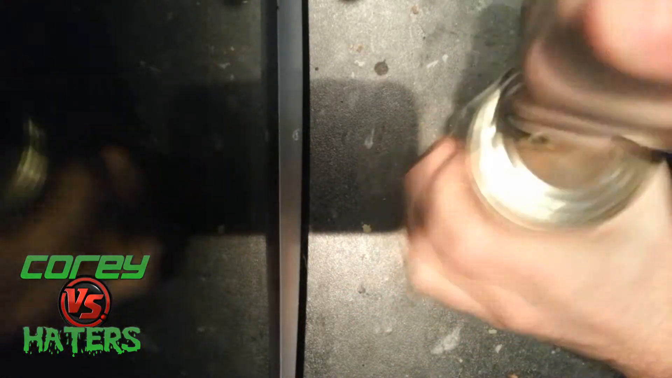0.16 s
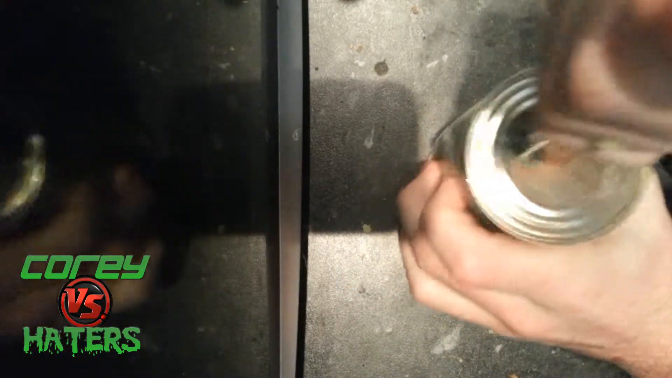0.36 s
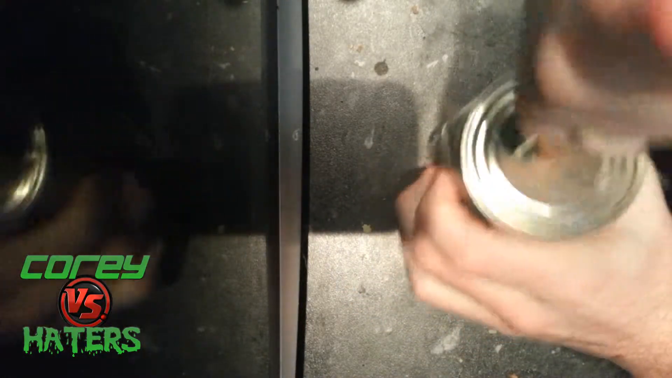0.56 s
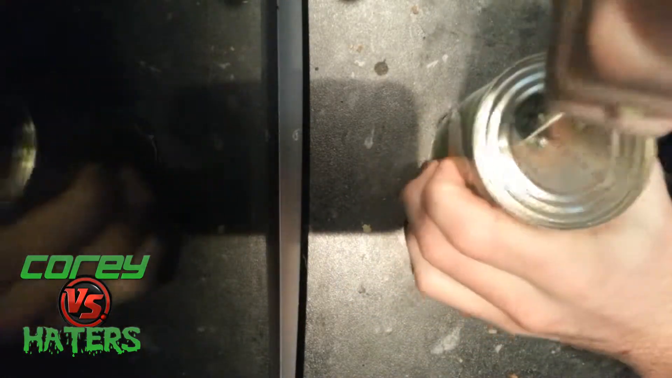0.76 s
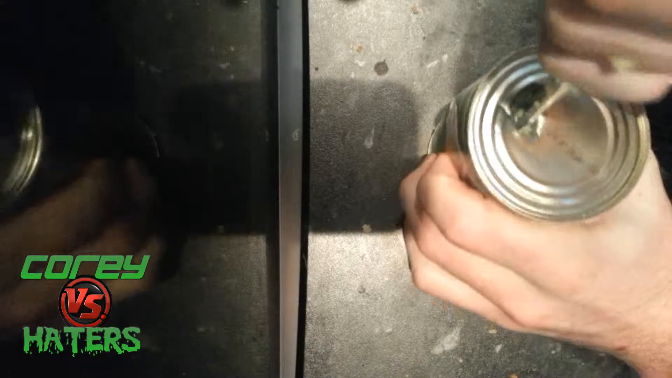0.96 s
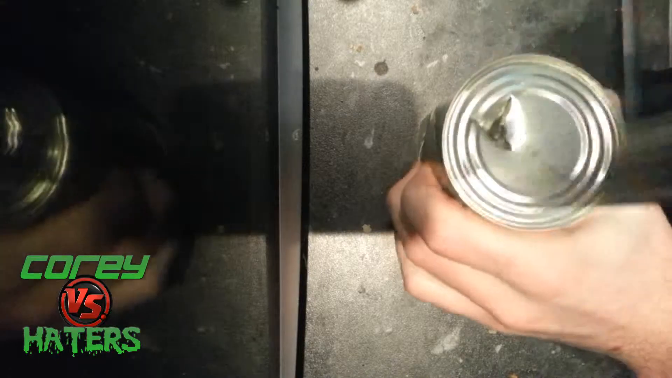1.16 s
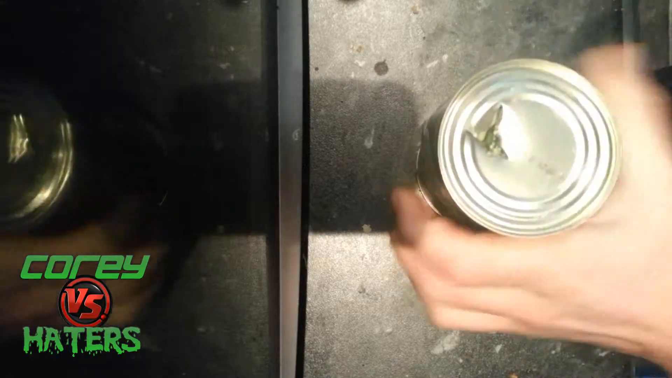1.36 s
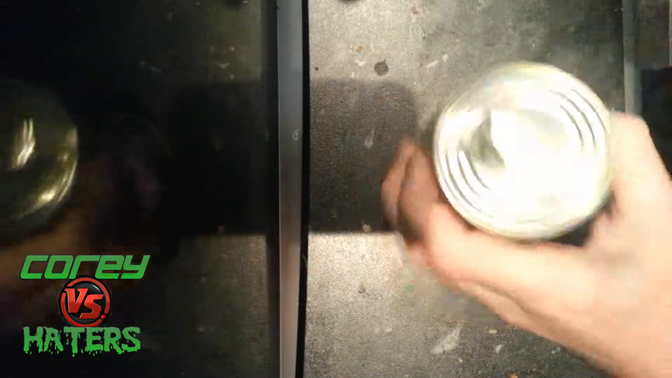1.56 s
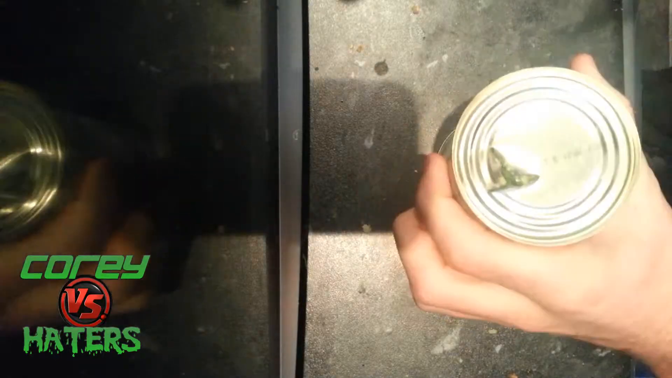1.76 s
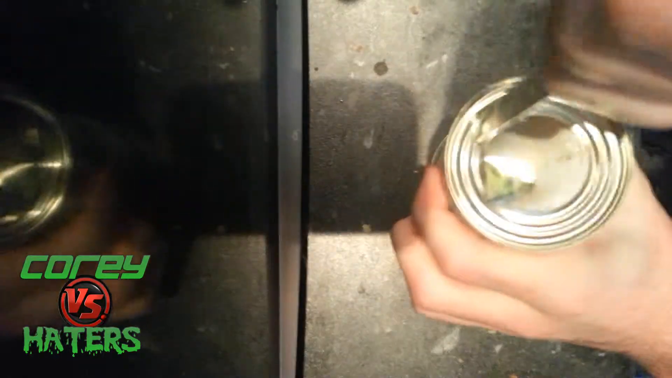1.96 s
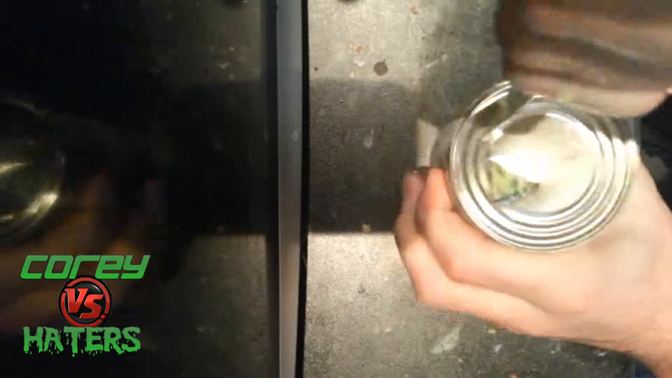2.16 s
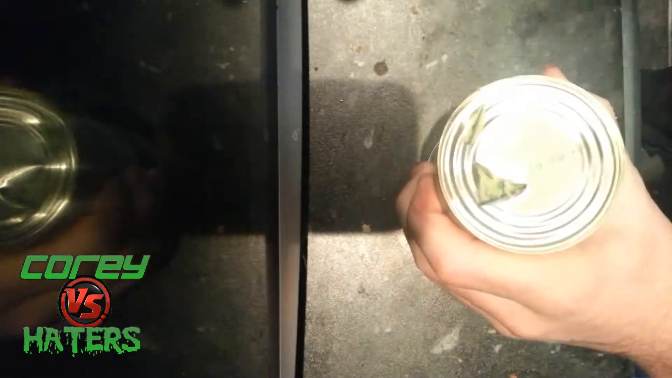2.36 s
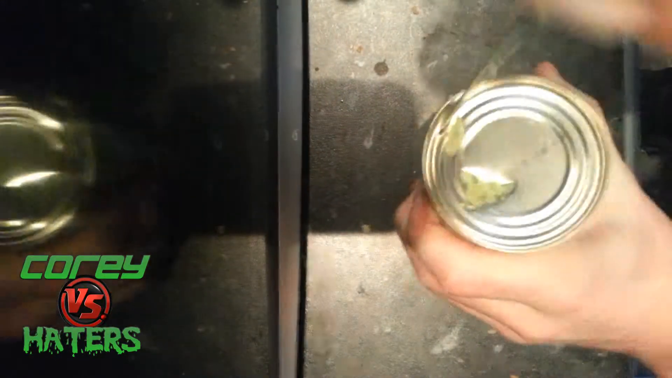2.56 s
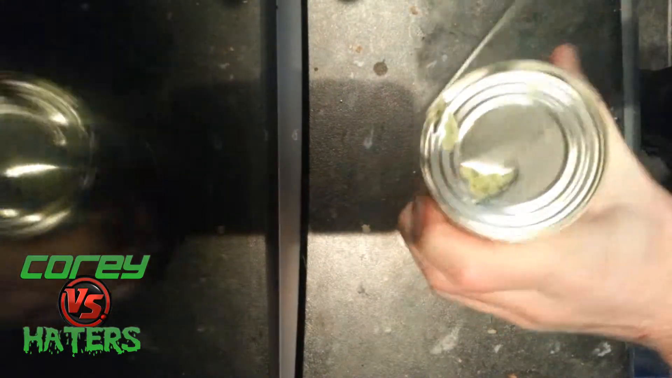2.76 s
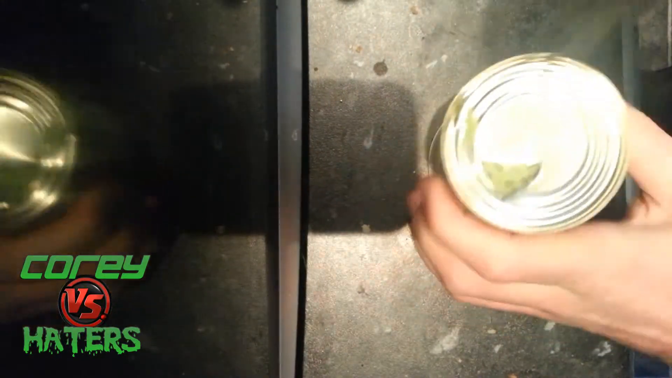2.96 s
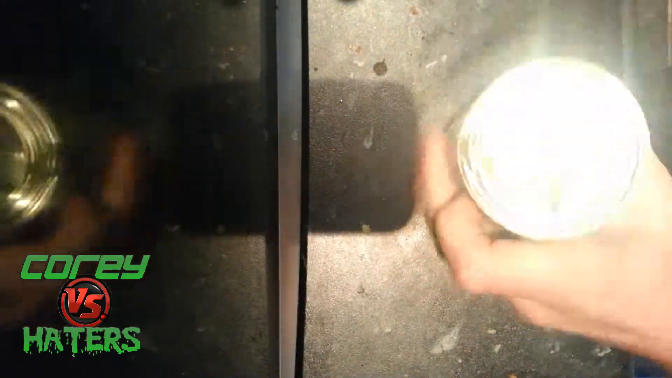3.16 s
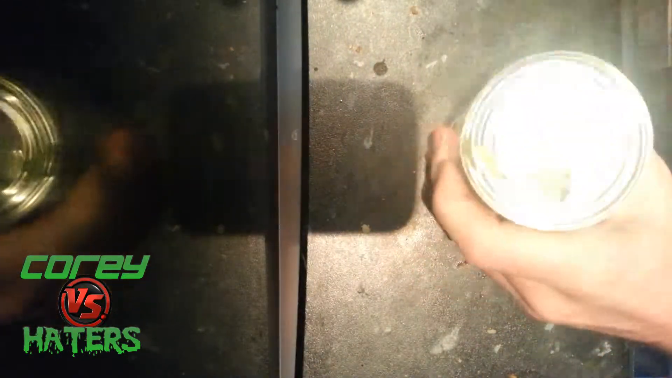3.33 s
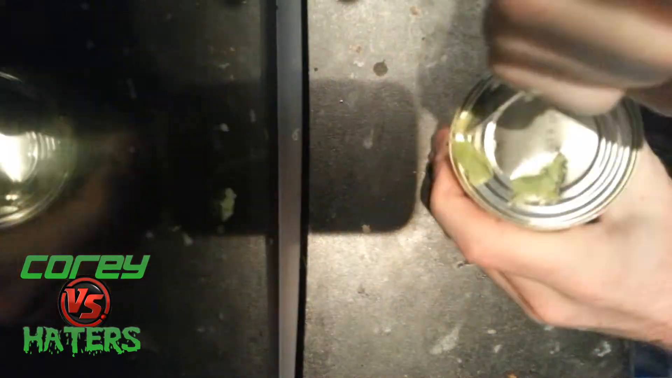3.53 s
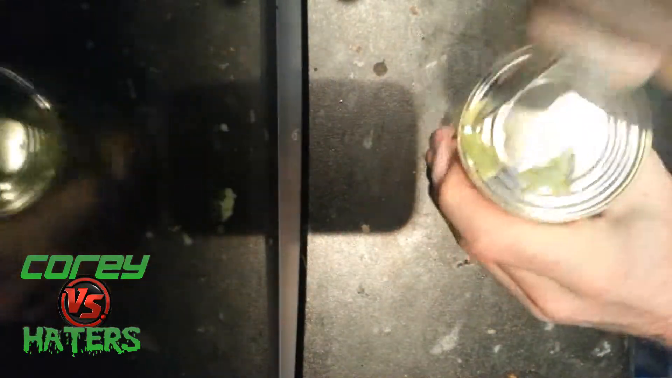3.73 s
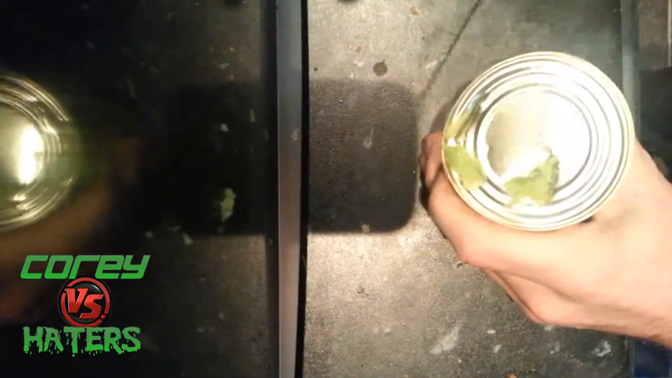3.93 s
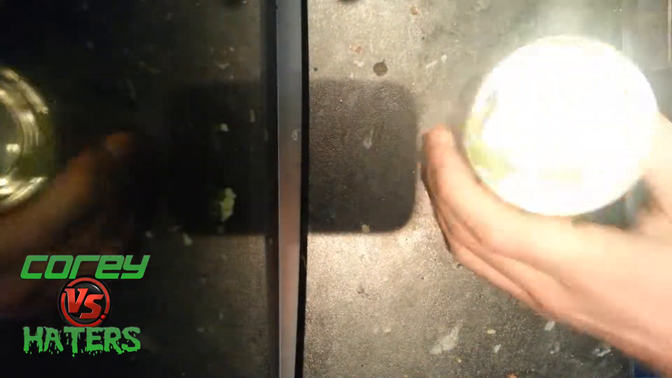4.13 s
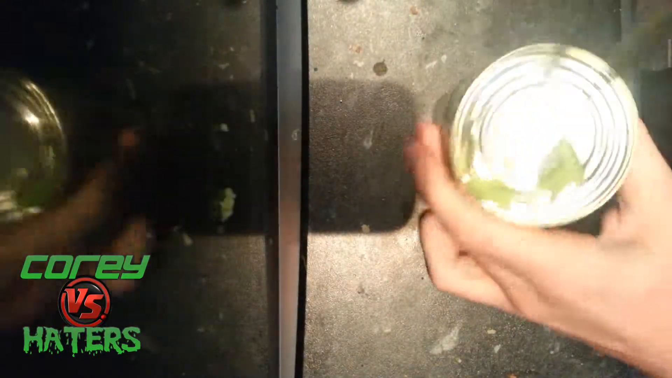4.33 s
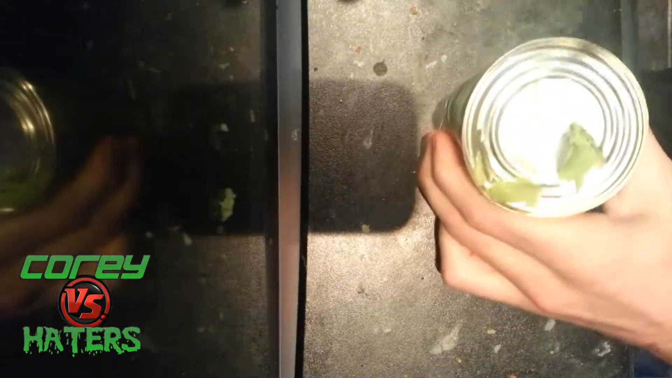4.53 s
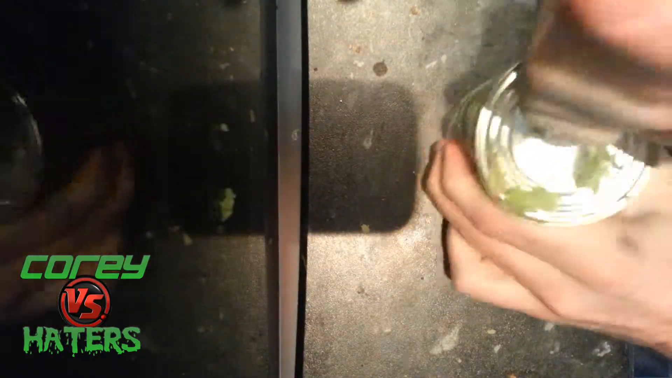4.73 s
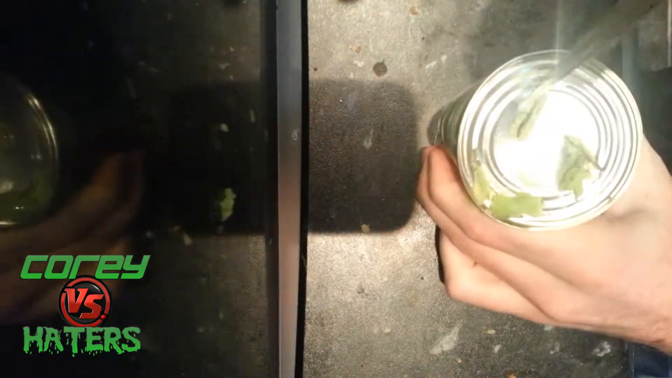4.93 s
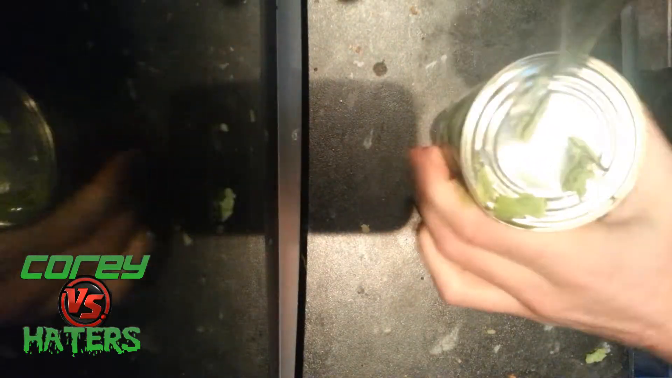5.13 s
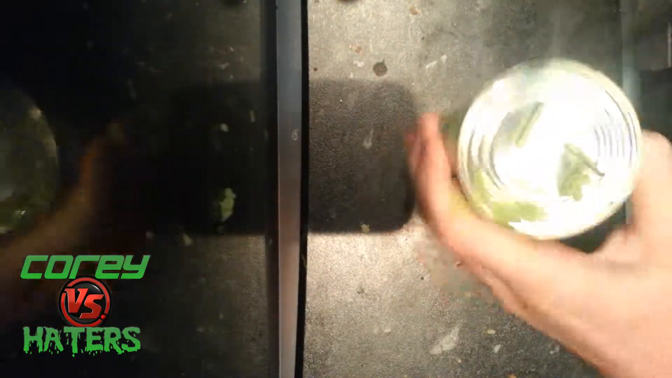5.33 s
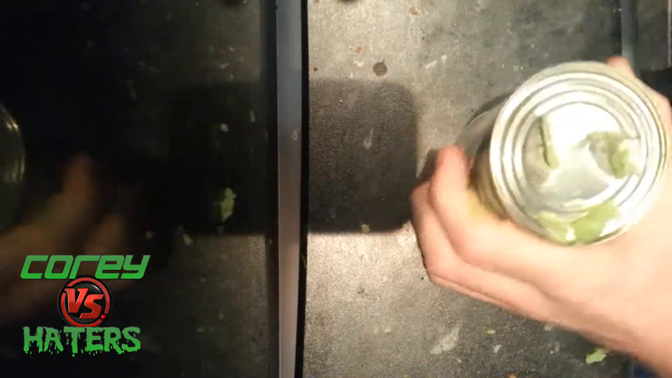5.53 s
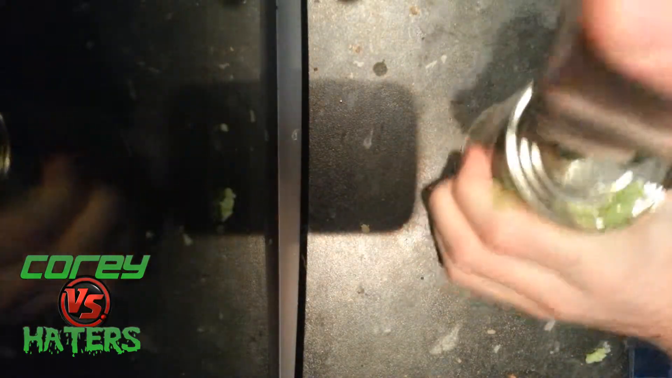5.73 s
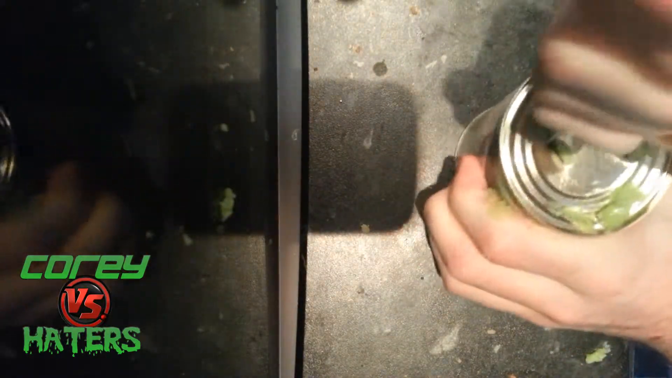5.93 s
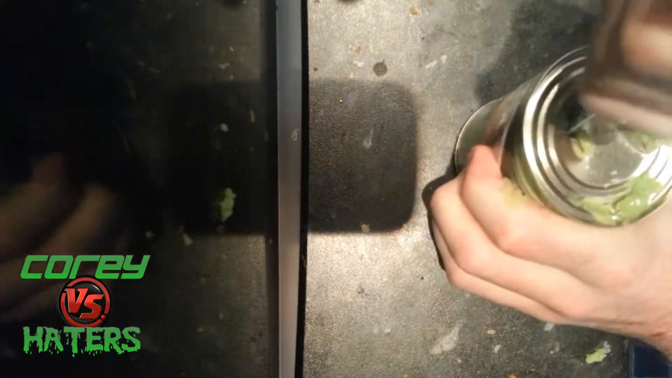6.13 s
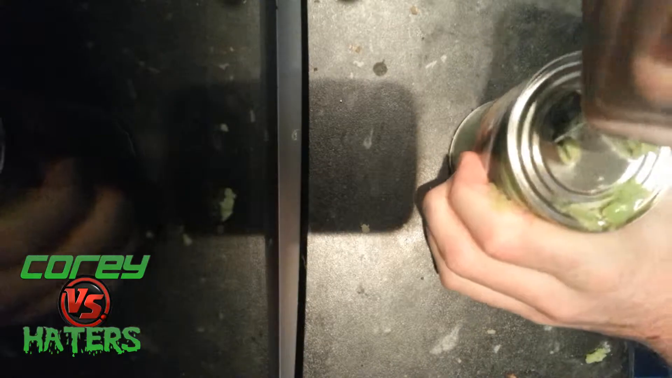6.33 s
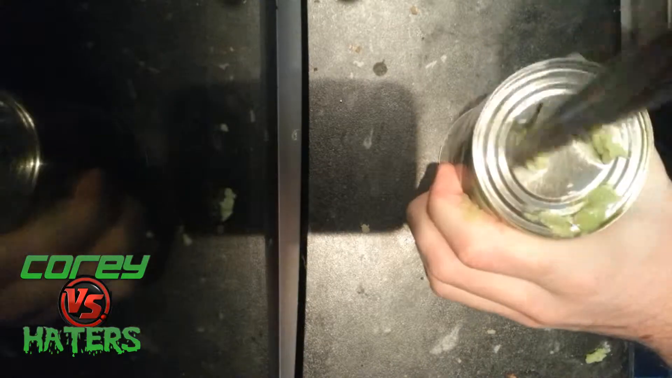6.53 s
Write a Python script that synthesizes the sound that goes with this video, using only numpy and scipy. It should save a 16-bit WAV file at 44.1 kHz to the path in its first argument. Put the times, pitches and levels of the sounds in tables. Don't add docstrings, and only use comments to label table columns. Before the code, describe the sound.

Ten sharp, overloaded stabs burst through a hand-held can's thin metal lid, with gritty blade scraping and light base knocks between, in an echoing kitchen.

```python
import sys
import numpy as np
from scipy import signal
from scipy.fft import rfft, irfft, next_fast_len
from scipy.io import wavfile
from scipy.ndimage import uniform_filter1d, map_coordinates

SR = 44100
rng = np.random.default_rng(int(sys.argv[2]) if len(sys.argv) > 2 else 0)


def to_wav(sig):
    pcm = np.clip(np.atleast_2d(sig), -1, 1) * 32767
    pcm = np.round(pcm).astype(np.int16)
    wavfile.write(sys.argv[1], SR, pcm.T)


def nominal_scale(level):
    x = np.asarray(level, float) / 20
    return 10 ** x


N = 290715

# (pitch [Hz], width [Hz], level [dB])
LID_MODES = [(522, 43, -8), (700, 237, -1.5), (822, 33, -4.5), (865, 40, -2), (1070, 480, -20),
             (1200, 310, -1.5)]
WALL_MODES = [(1516, 210, -7.5), (1664, 470, 12.5), (2040, 300, -6.5), (2450, 160, 5.5), (2660, 92, 5.5),
              (2678, 1100, 5)]
RIM_MODES = [(3150, 630, -6), (3810, 800, -3), (3760, 350, -5), (3920, 140, -1.5), (4255, 390, -1),
             (4306, 37, -16)]
CRACKLE_MODES = [(6610, 600, 23.5), (7200, 6300, 16), (8980, 280, 20), (11200, 1500, 11)]
# (pitch [Hz], width [Hz], level [dB])
BASE_MODES = [(365, 110, -9), (660, 200, -3.5), (765, 90, 2), (930, 22, -6.5), (1200, 360, -4)]

# (time [s], length [s], level at the end [dB], swell [dB], brightness [dB])
SLIDES = [(0.0, 0.23, -38, 5, 6), (0.244, 0.34, -63.5, -36.5, 19), (1.141, 0.25, -39, -25, 2),
          (1.568, .135, -20, 7, -15), (2.023, 0.13, -22, -11, -8.5), (2.196, .05, -8.5, 12, -30),
          (2.628, .18, -14.5, -6, -1), (3.513, 0.13, -12.5, 10.5, -21), (4.198, 0.29, -53, -28, -14),
          (4.657, 0.14, -33.5, -1, 14), (5.301, 0.096, -30.5, -3, -16), (5.406, .1, -27.5, -3.5, -25.5),
          (5.71, 0.24, -44, 8, 2.5), (6.242, 0.033, -25.5, -3.5, -0.5), (6.53, 0.043, -43, -8, -4)]
# (time [s], length [s], level at the end [dB], brightness [dB], crackle against the wall [dB])
SCRAPES = [
    (2.233, 0.021, -12.5, 5, -4.5),
    (3.802, 0.0665, -14.5, -13.5, -3.5),
    (4.791, .03, -14, -1, -11.5),
    (5.911, 0.052, -6, -0.5, -23),
    (6.456, 0.035, 2.5, -10, -12),
]
# (time [s], level [dB], hardness [dB])
KNOCKS = [(0.002, -26, -9), (0.045, -32.5, -12.5), (0.508, -24.5, -21), (0.575, -36, -21),
          (0.789, -16.5, -16), (0.912, -25, -15), (3.004, -22.5, -13), (4.145, -14.5, -13),
          (4.68, -20.5, -16), (4.868, -25, -5.5), (5.086, -28.5, -5), (5.298, -30, -10.5),
          (6.136, -23, -14), (6.274, -14.5, -10.5), (6.327, -9.5, -14.5)]
# (time [s], base level [dB], wall level [dB], rim level [dB])
SNAGS = [(0.387, -22.5, -18.5, -19.5), (1.117, -26.5, -7, -14), (1.549, -37, -32.5, -29.5),
         (2.649, -26.5, -15.5, -34), (3.807, -26.5, -41, -30), (3.844, -24, -35, -21.5),
         (3.858, -20, -23.5, -41), (4.911, -46, -31, -23.5), (5.91, -33, -15, -19.5),
         (5.989, -17, -16, -31), (6.146, -34, -22, -35.5), (6.252, -24.5, -15.5, -25),
         (6.347, -26, -18.5, -21.5), (6.356, -20, -14.5, -24), (6.47, -35, -20, -7)]
# (time [s], rim level [dB], crackle against the rim [dB])
TICKS = [(2.208, -48, 6.5), (2.887, -34, -17), (2.943, -40.5, -10), (3.293, -44.5, -15), (3.611, -35, -12),
         (4.086, -50, -2), (4.126, -50, -2), (4.531, -78, 5), (5.013, -50, -17), (5.155, -49, -9),
         (5.197, -50.5, -12), (5.234, -57, 2), (6.113, -37, -18), (6.376, -63, 3)]
# (time [s], level [dB], pitch [Hz], time to fall 60 dB [s])
DENTS = [(.002, -42, 3500, .95), (.186, -13, 4146, 0.47), (.186, -11, 3390, 0.43),
         (.575, -31.5, 778, 0.055), (2.648, -13.5, 3760, 0.46), (3.5, -14, 3770, 0.3),
         (.911, -13.5, 816, 0.036), (1.078, -12, 2573, 0.37), (1.078, -19, 1130, 0.092),
         (2.263, 4, 1100, 0.048), (2.298, -18.5, 1100, 0.12), (6.46, -17.5, 5000, 0.37),
         (2.544, -0.5, 2250, 0.082), (3.421, -16, 1180, 0.21), (3.843, -14, 4140, 0.027),
         (3.855, -21, 4020, 0.02), (4.591, -3.5, 4630, 0.13), (5.085, -27, 700, 0.16),
         (5.659, -16, 4100, 0.74), (6.14, -19.5, 1410, 0.04), (6.357, -34, 1310, 0.04),
         (6.437, -10, 2370, 0.34)]
# (time [s], lid level [dB], wall level [dB], rim level [dB], tearing time [s])
STABS = [
    (0.183, -13.5, -16.5, -5, 0.022),
    (1.076, -10.5, -12.5, -8, 0.015),
    (1.924, -4, -3.5, -1.5, 0.005),
    (2.261, -9, -12, -21, 0.012),
    (2.542, 2, -3, -4, 0.0031),
    (3.071, -12.5, -15, -16, 0.0028),
    (3.42, 0, -4, -5.5, 0.0083),
    (4.591, -3.5, -7.5, -3.5, 0.0049),
    (5.656, -7.5, -9.5, -2.5, 0.0048),
    (6.435, -8.5, -15.5, -9, 0.03),
]
# (time [s], level [dB], pitch [Hz], time to fall 60 dB [s])
THUDS = [(0.185, -25.5, 362, 0.12), (0.507, -45.5, 345, 0.23), (0.792, -49.5, 430, 0.17),
         (0.908, -43, 330, 0.13), (1.077, -25, 342, 0.15), (1.921, -18, 367, 0.28),
         (2.262, -27.5, 327, 0.036), (2.542, -42.5, 184, 0.15), (2.645, -27, 250, 0.53),
         (2.75, -24, 380, 0.52), (3.07, -25, 331, 0.15), (3.5, -21.5, 237, 0.3), (3.421, -12, 233, 0.12),
         (3.843, -33, 360, 0.16), (4.142, -44.5, 327, 0.056), (4.591, -26, 216, 0.05),
         (5.08, -37, 340, 0.17), (5.658, -19, 379, 0.21), (5.906, -22.5, 314, 0.11),
         (6.27, -32.5, 342, 0.2), (6.323, -35.5, 332, 0.14), (6.434, -15, 293, 0.11)]
# (time [s], level [dB])
BLADE_RINGS = [(1.079, -54), (2.0, -66.5), (3.07, -56), (4.089, -59), (4.6, -48.5), (4.911, -69),
               (6.143, -59.5)]
# (pitch [Hz], time to fall 60 dB [s])
KITCHEN_DECAY = [(200, 0.33), (700, 0.35), (2000, 0.33), (4500, 0.22), (8000, 0.26), (14000, 0.2)]
# (pitch [Hz], level [dB per Hz])
HUSH_COLOUR = [(30, -20.5), (54, -28), (202, -3), (459, 2), (700, -3.5), (6400, -21), (13900, -20.5),
               (15400, -57)]
# (pitch [Hz], level [dB])
LEFT_OVER_RIGHT = [(150, -2), (700, 6), (1500, -1), (4500, 5.5), (8000, -7), (14000, -4)]


def unit(x):
    return x / np.sqrt(np.mean(x ** 2) + 1e-20)


def along(points, hz):
    f, v = np.transpose(points)
    return np.interp(np.log(hz + 1), np.log(f + 1), v)


def filtered(x, response):
    n = x.shape[-1]
    m = next_fast_len(n + 8192)
    return irfft(rfft(x, m) * response(np.fft.rfftfreq(m, 1 / SR)), m)[..., :n]


def hush():
    noise = rng.standard_normal((2, N))
    return nominal_scale(-50) * unit(filtered(noise, lambda hz: nominal_scale(along(HUSH_COLOUR, hz))))


def slips(n, spiky_db):
    return unit(rng.standard_normal(n) * nominal_scale(spiky_db * rng.exponential(size=n)))


def ringing(force, modes, scatter_db=0., size=4096):
    f = np.fft.rfftfreq(size, 1 / SR) + 1
    center, width, db = np.transpose(modes)[..., None]
    strength = nominal_scale(2 * (db + scatter_db * rng.standard_normal(db.shape)))
    power = strength * (f * width) ** 2 / ((center ** 2 - f ** 2) ** 2 + (f * width) ** 2)
    patch = 1 / (1 + (f / (1.393 * center.max())) ** 6)
    cepstrum = irfft(.5 * np.log(power.sum(axis=0) * patch + 1e-12))
    cepstrum[1:size // 2] *= 2
    cepstrum[size // 2 + 1:] = 0
    response = irfft(np.exp(rfft(cepstrum)))[:size // 2]
    return signal.fftconvolve(force, response)[:len(force)]


def rubbing():
    out = np.zeros(N)
    grip = nominal_scale(1.6 * map_coordinates(rng.standard_normal(N // 400 + 4), [np.arange(N) / 400]))
    parts = (LID_MODES, WALL_MODES, RIM_MODES, CRACKLE_MODES)
    lid, wall, rim, crackle = (unit(ringing(grip * slips(N, spiky_db=2.5), modes)) for modes in parts)
    slides = [(*row, -28.5) for row in SLIDES]
    scrapes = [(s, length, db, 1, bright, crack) for s, length, db, bright, crack in SCRAPES]
    for s, length, db, swell_db, bright_db, crackle_db in slides + scrapes:
        span = np.arange(max(0, round(s * SR)), min(N, round((s + length) * SR)))
        t = span / SR - s
        on = np.clip(np.minimum(t / 0.01, (length - t) / 0.005), 0, 1)
        level = nominal_scale(db - 12.5 + swell_db * (t / length - 1))
        bright = nominal_scale(bright_db)
        middle = wall[span] + nominal_scale(crackle_db) * crackle[span]
        out[span] += on * level * (lid[span] + np.sqrt(bright) * middle + bright * rim[span])
    return out


def contacts(events, parts, drive_db, blow, spiky_db, shudder_db, shudder_t60, size):
    out, t = np.zeros(N + SR), np.arange(size) / SR
    for s, *levels_db, push_s in events:
        for modes, db, lasting in zip(parts, levels_db, (1.08, 0.79, 0.87, 0.84)):
            shudder = nominal_scale(shudder_db - 60 * t / (shudder_t60 * lasting))
            push = 1 / (1 + (t / push_s) ** 4) + shudder
            force = push * slips(size, spiky_db)
            force[0] = blow
            ring = ringing(force, modes, scatter_db=1.0)
            loudest = np.sqrt(uniform_filter1d(ring ** 2, size=256).max())
            out[round(s * SR):][:size] += nominal_scale(db + drive_db) * ring / loudest
    return out[:N]


def taps():
    events = []
    for s, db, hardness in KNOCKS:
        rim = db + 2.15 * hardness
        events.append((s, db, db + hardness, rim, rim - 2, 0.0042))
    for s, base, wall, rim in SNAGS:
        events.append((s, base, wall, rim, rim - 11, 0.002))
    for s, rim, crackle in TICKS:
        events.append((s, rim - 25, rim - 0.5, rim, rim + crackle, 0.0072))
    return contacts(events, (BASE_MODES, WALL_MODES, RIM_MODES, CRACKLE_MODES), drive_db=1.5, blow=5.8,
                    spiky_db=3.5, shudder_db=-33.0, shudder_t60=0.51, size=SR // 4)


def rough_modes(events, sharpness):
    out, t = np.zeros(N + SR), np.arange(SR // 2) / SR
    for s, db, hz, t60 in events:
        shape = [(hz, hz / sharpness, 0)]
        shocks = rng.standard_normal(len(t))
        mode = unit(ringing(ringing(shocks, shape), shape))
        onset = 1 - np.exp(-t / 0.00034)
        out[round(s * SR):][:len(t)] += nominal_scale(db - 60 * t / t60) * onset * mode
    return out[:N]


def dents():
    return rough_modes(DENTS, sharpness=6)


def stabs():
    events = [(s, lid, wall, rim, rim - 11.5, tear) for s, lid, wall, rim, tear in STABS]
    return contacts(events, (LID_MODES, WALL_MODES, RIM_MODES, CRACKLE_MODES), drive_db=8.0, blow=15.75,
                    spiky_db=3.0, shudder_db=-20.5, shudder_t60=0.82, size=SR // 2)


def thuds():
    return rough_modes(THUDS, sharpness=3.5)


def blade():
    out, t = np.zeros(N + SR), np.arange(SR // 2) / SR
    hz = 13120
    pair = np.sin(2 * np.pi * hz * t) + .6 * np.sin(2 * np.pi * (hz + 23) * t)
    for s, db in BLADE_RINGS:
        out[round(s * SR):][:len(t)] += nominal_scale(db - 60 * t / 1.1) * pair
    return out[:N]


def kitchen(x, step=SR // 6):
    out = np.zeros((2, N + 2 * SR))
    for i in range(0, N, step):
        hz, t, z = signal.stft(rng.standard_normal((2, 30000)), SR, nperseg=256)
        swell = 1 - np.exp(-t / 0.0011)
        decay = nominal_scale(-60 * t / along(KITCHEN_DECAY, hz)[:, None])
        tail = signal.istft(z * swell * decay, SR, nperseg=256)[1]
        wet = signal.fftconvolve(x[None, i:i + step], tail / np.linalg.norm(tail[0]), axes=1)
        out[:, i:i + wet.shape[1]] += wet
    return out[:, :N]


def scene():
    body = stabs() + rubbing() + blade() + thuds() + dents()
    light = taps()

    def arrival(hz):
        left_lag = 17 / 44100
        return np.array([nominal_scale(0.5) * np.exp(-2j * np.pi * hz * left_lag), np.ones(len(hz))])

    direct = filtered(np.array([body + light] * 2), arrival)
    heard = direct + kitchen(nominal_scale(-2.5) * body + nominal_scale(-2) * light)
    balanced = filtered(heard, lambda hz: nominal_scale(np.outer([.5, -.5], along(LEFT_OVER_RIGHT, hz))))
    return balanced + hush()


def starved(x, slope, under_db, from_hz, size=8):
    hz, t, z = signal.stft(x, SR, nperseg=1024)
    bands = (np.abs(z[:, :512]) ** 2).reshape(2, -1, size, len(t)).sum(axis=2)
    bands_db = 10 * np.log10(np.abs(uniform_filter1d(bands, size=3, axis=2)) + 1e-14)
    loud_db = 10 * np.log10(bands.sum(axis=1, keepdims=True) + 1e-14)
    recent_db = np.minimum(uniform_filter1d(loud_db, size=5, axis=2, origin=2), -21)
    bands_db += 7 * uniform_filter1d(rng.standard_normal(bands.shape[1:]), size=6, axis=1)
    keep = np.clip(bands_db - slope * recent_db + under_db, .01, 1)
    z[:, :512] *= np.where(hz[:512, None] > from_hz, np.repeat(keep, size, axis=1), 1)
    return signal.istft(z, SR, nperseg=1024)[1][:, :N]


def top_cut(x):
    return signal.sosfilt(signal.butter(12, 15500, fs=SR, output="sos"), x)


def record(dry):
    def microphone(hz):
        bass_cut = (1j * hz / (200 + 1j * hz)) ** 2
        return bass_cut * np.clip((14800 - hz) / 400, 0, 1)

    thin = filtered(dry, microphone)
    clipped = thin / (1 + np.abs(thin / .97) ** 12) ** (1 / 12)
    mix = starved(clipped, slope=1.6, under_db=24, from_hz=7000)
    return top_cut(mix)


dry = scene()
out = record(dry)
to_wav(out)
```